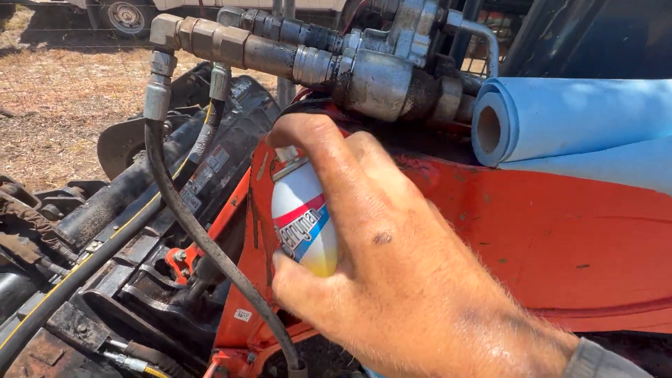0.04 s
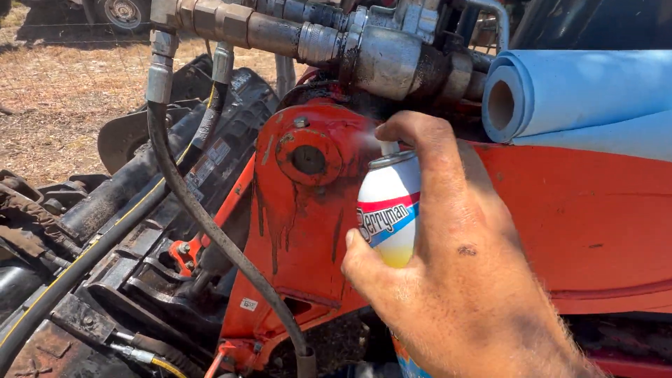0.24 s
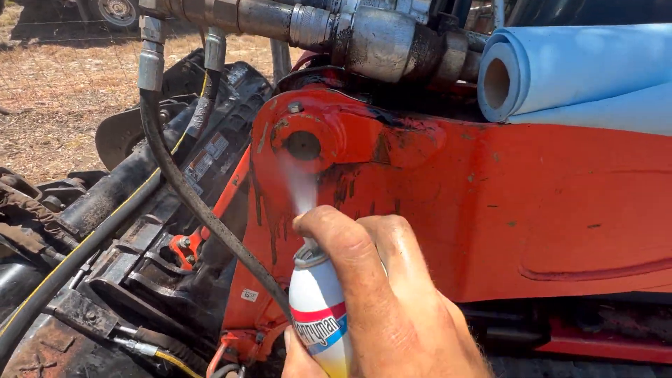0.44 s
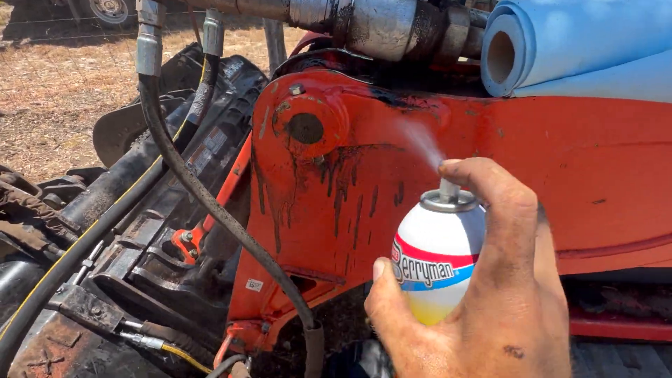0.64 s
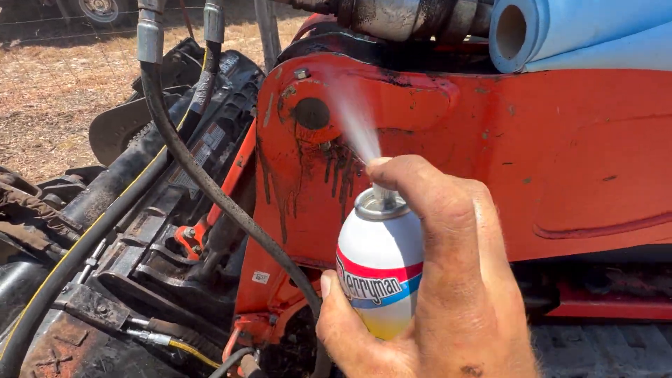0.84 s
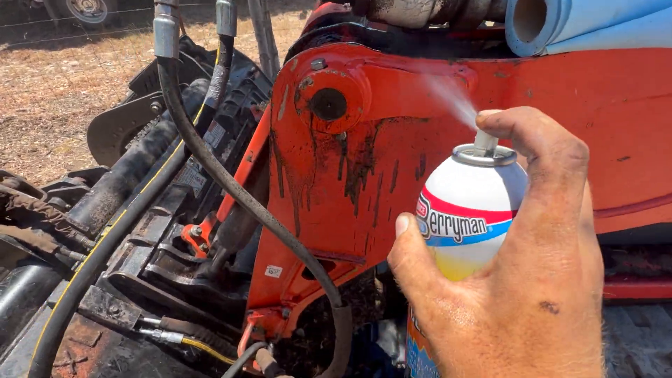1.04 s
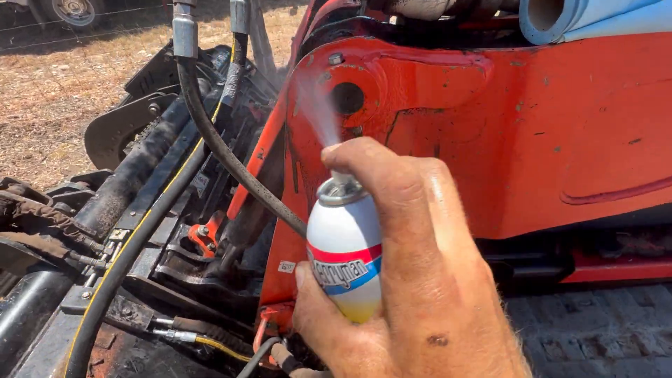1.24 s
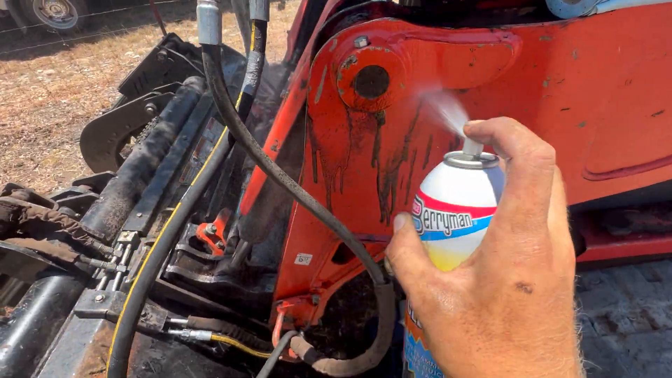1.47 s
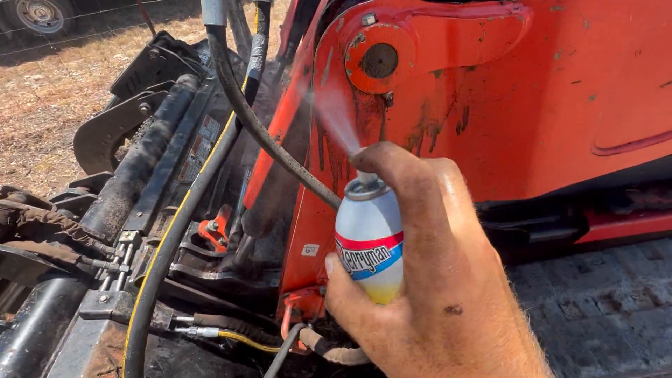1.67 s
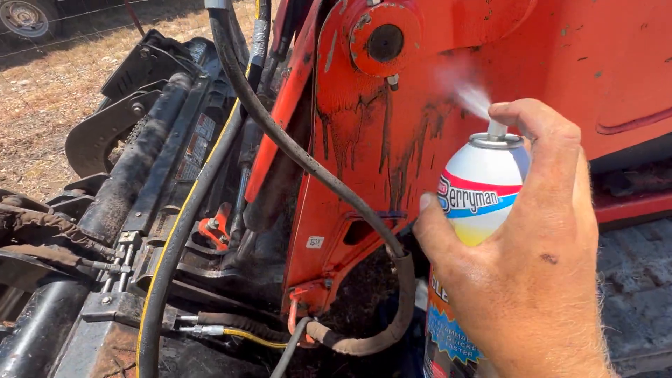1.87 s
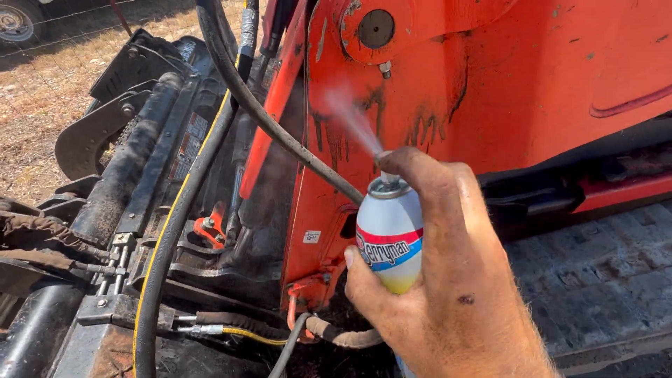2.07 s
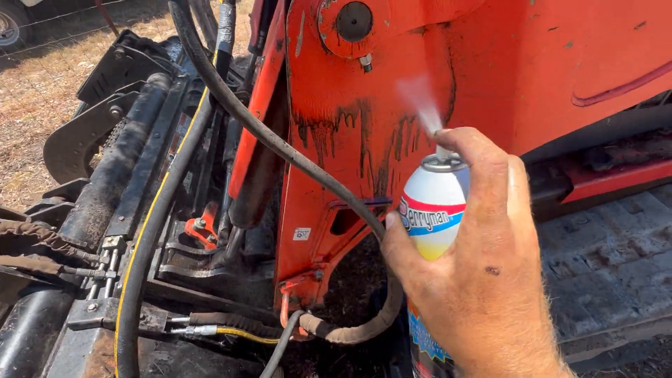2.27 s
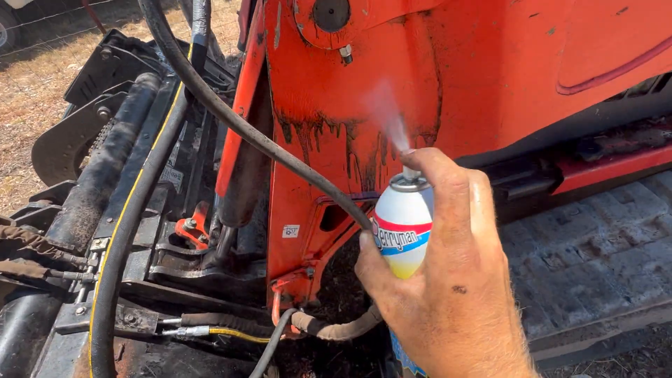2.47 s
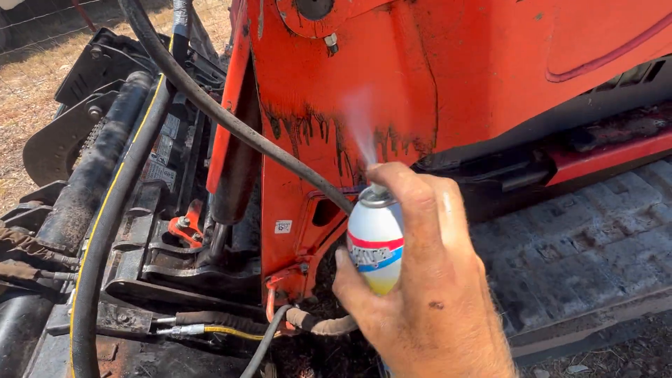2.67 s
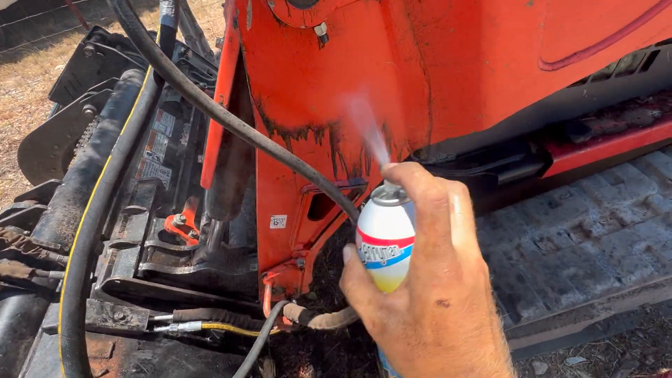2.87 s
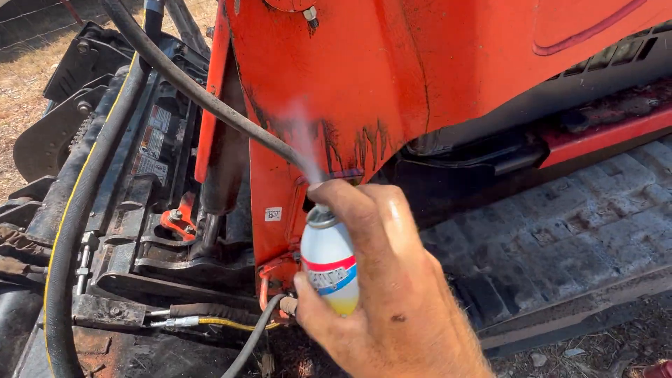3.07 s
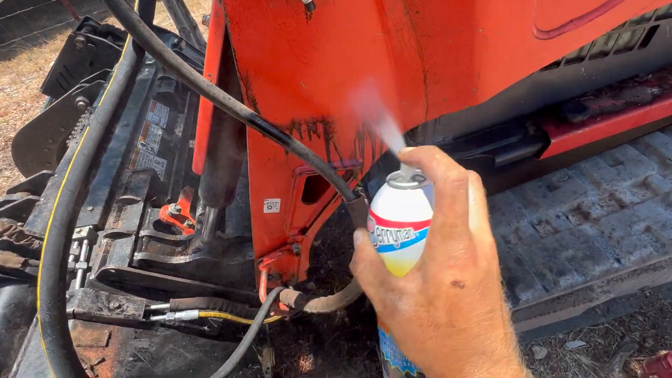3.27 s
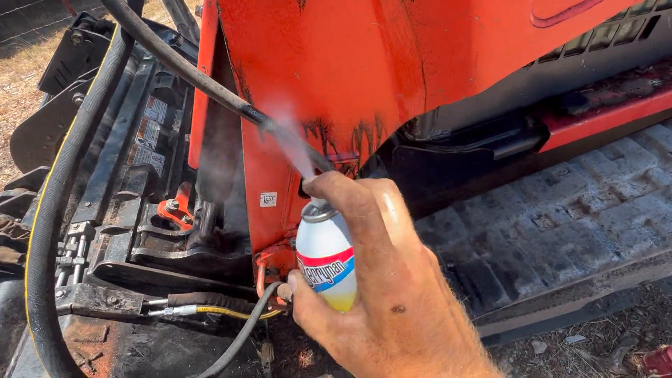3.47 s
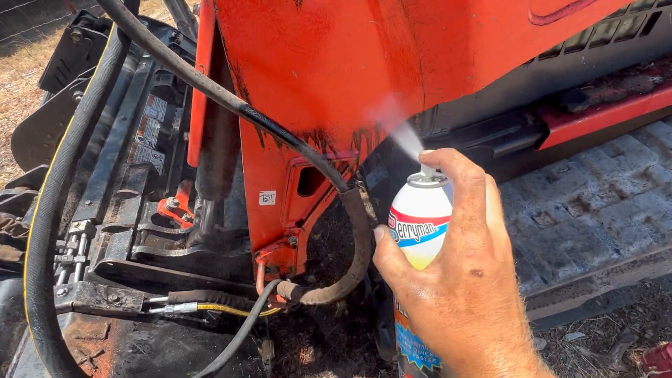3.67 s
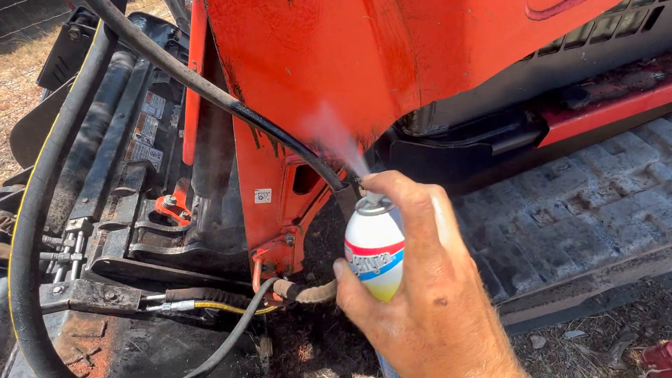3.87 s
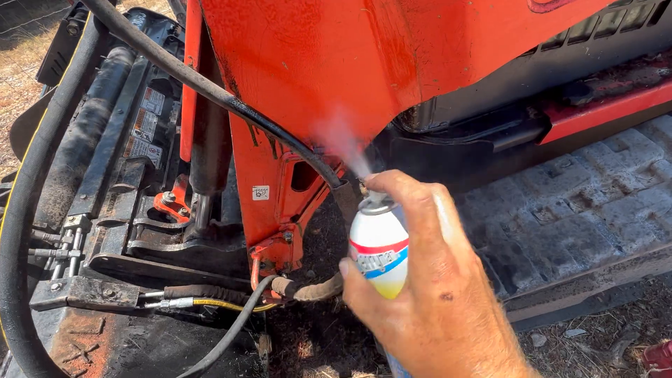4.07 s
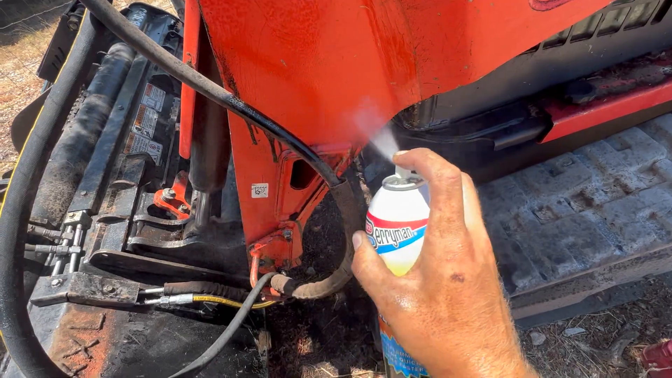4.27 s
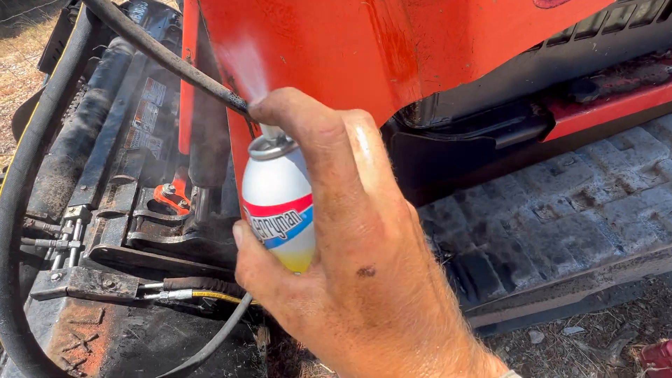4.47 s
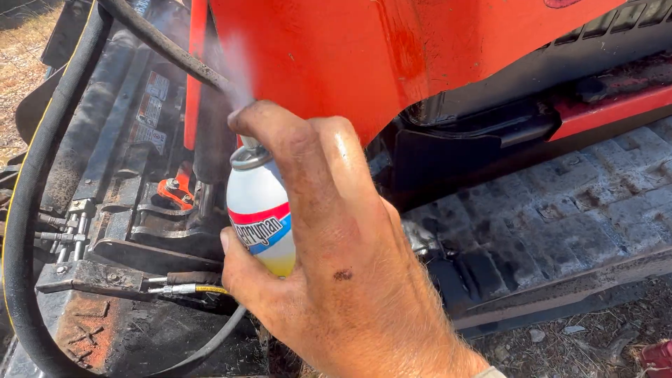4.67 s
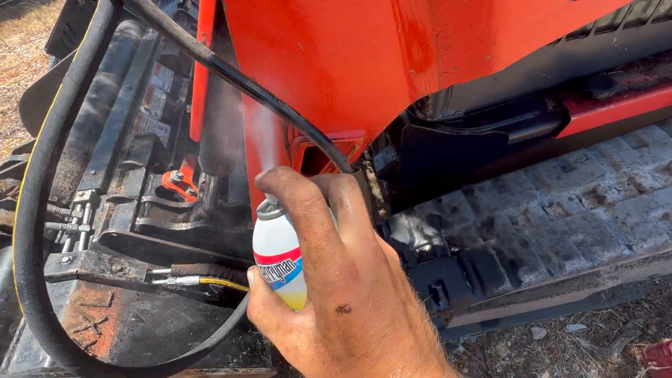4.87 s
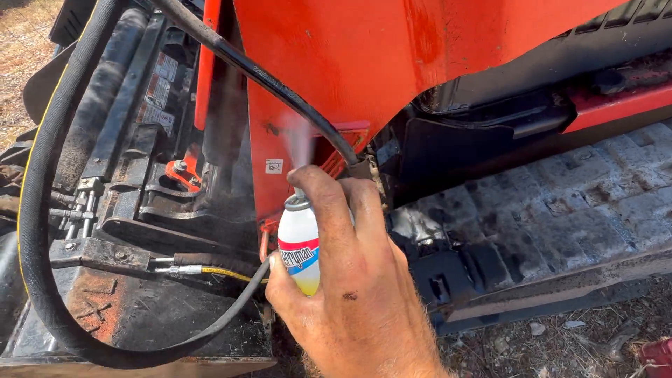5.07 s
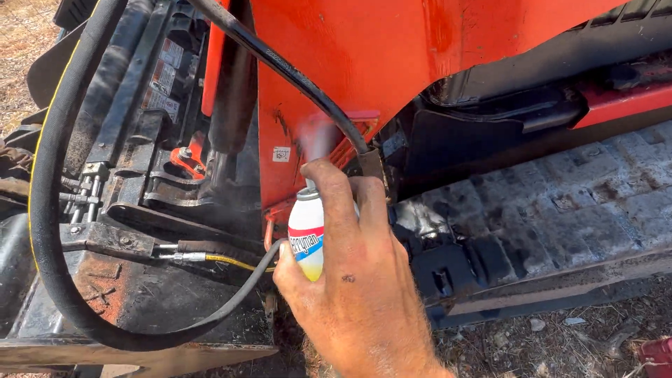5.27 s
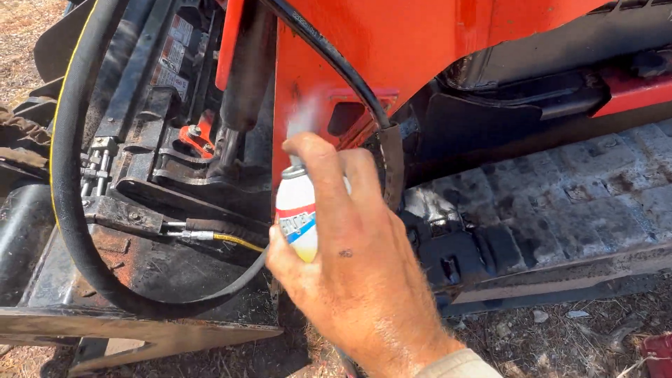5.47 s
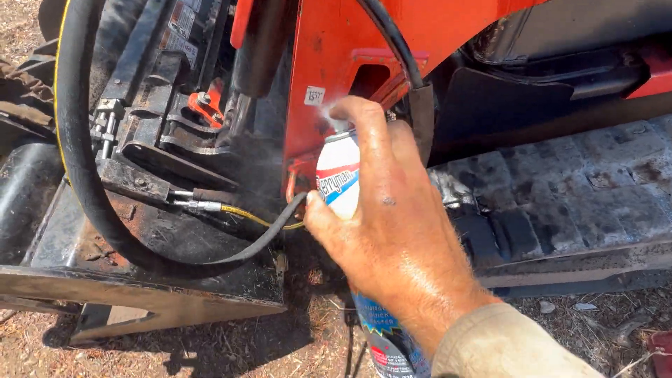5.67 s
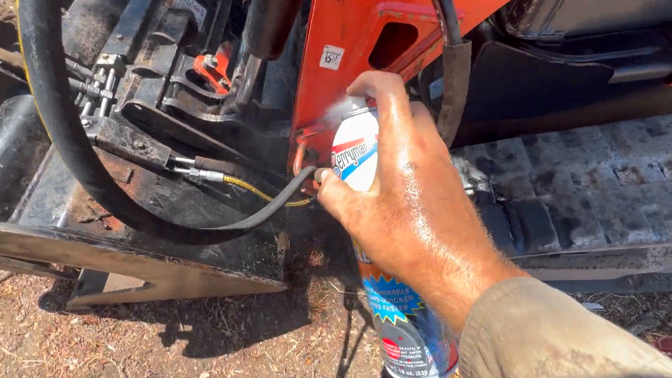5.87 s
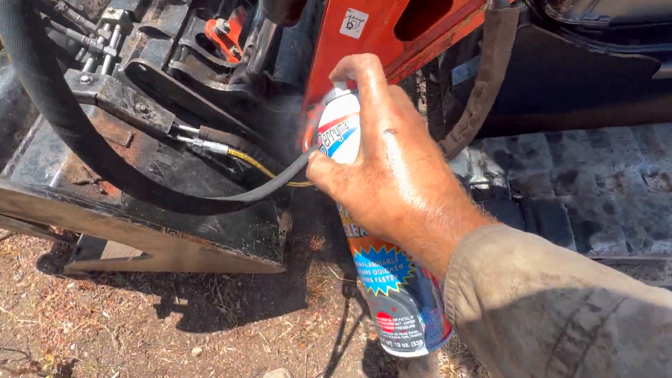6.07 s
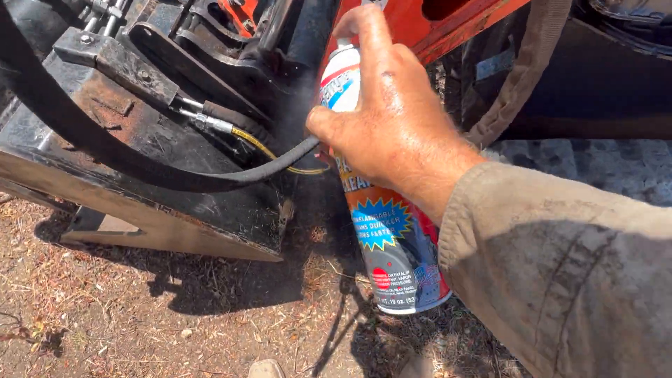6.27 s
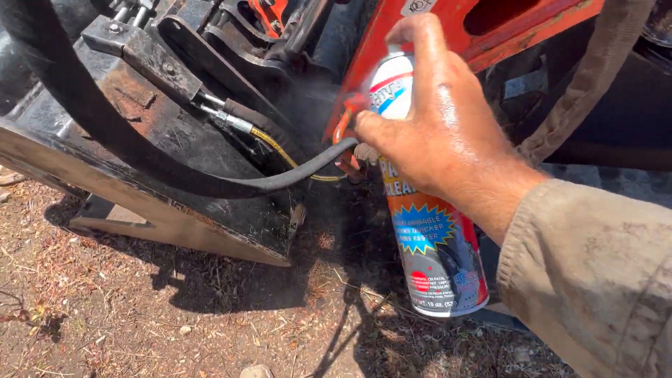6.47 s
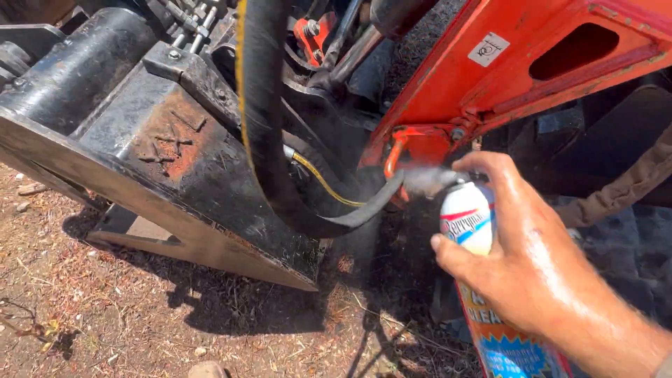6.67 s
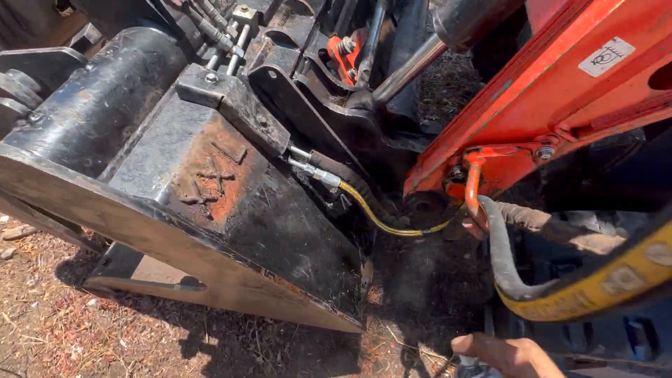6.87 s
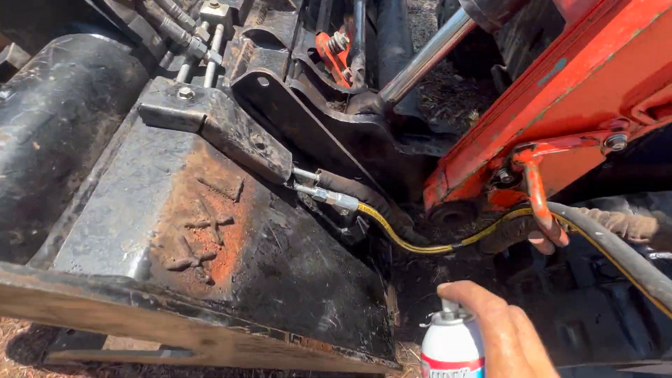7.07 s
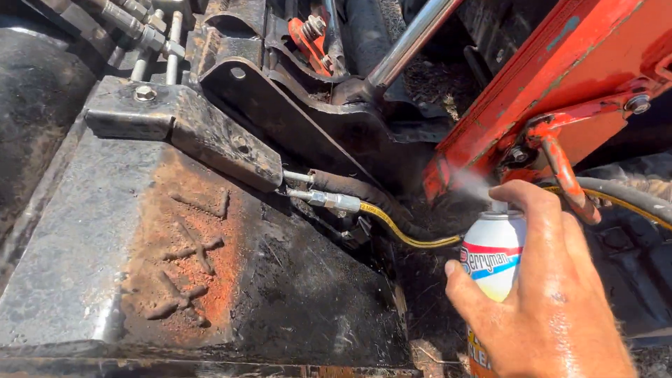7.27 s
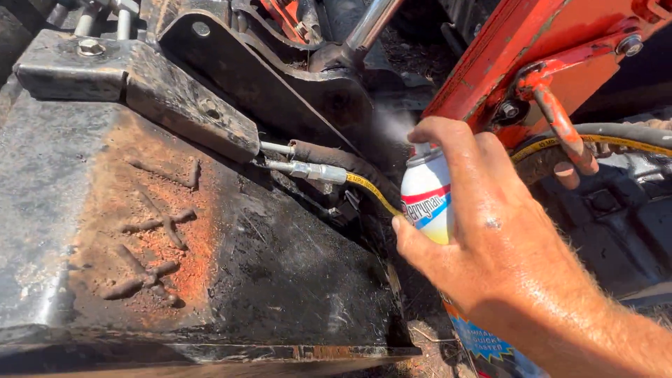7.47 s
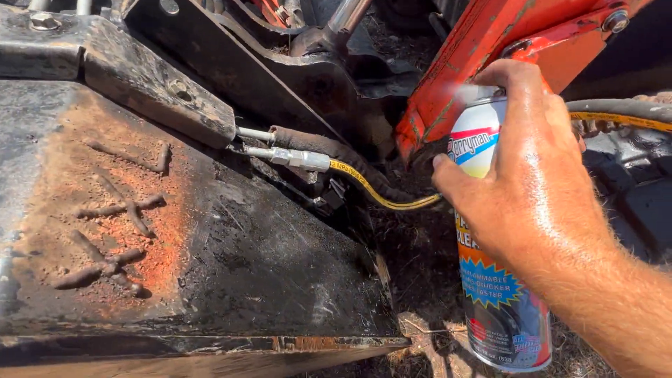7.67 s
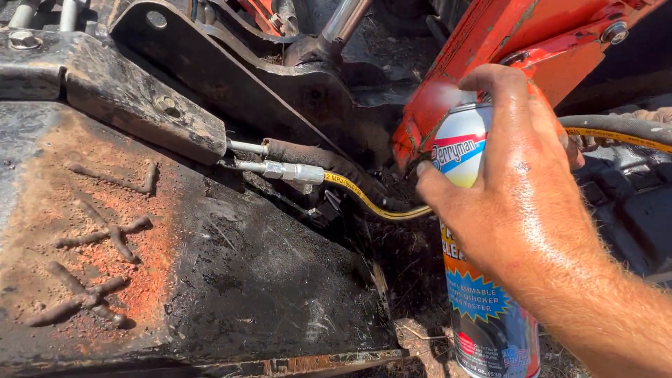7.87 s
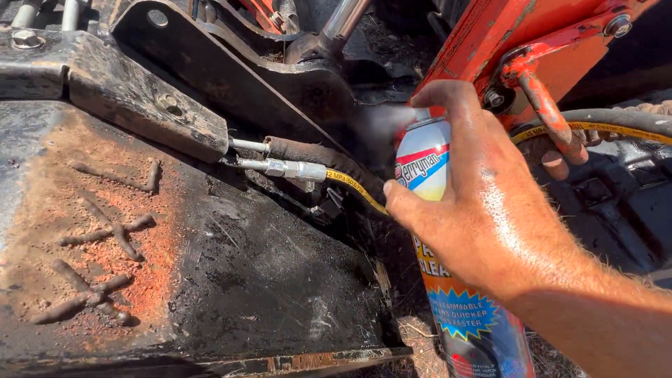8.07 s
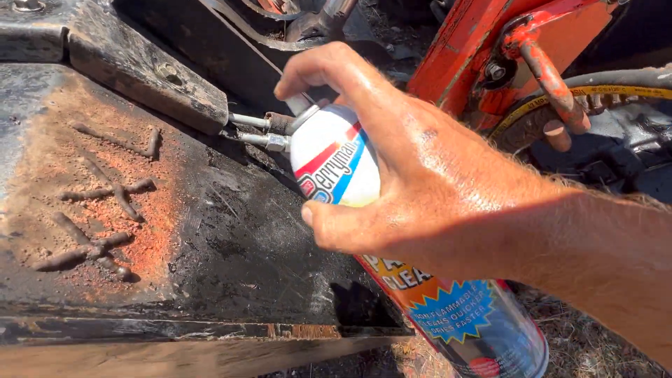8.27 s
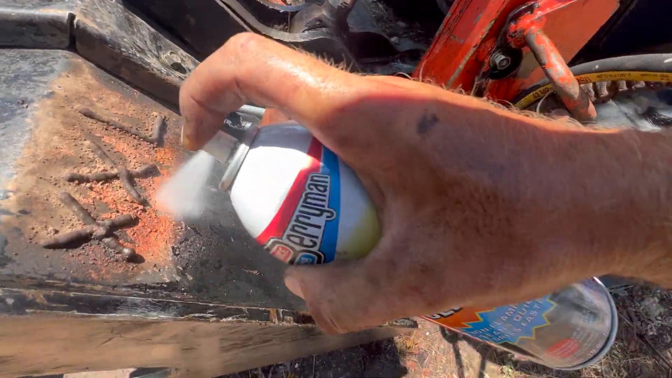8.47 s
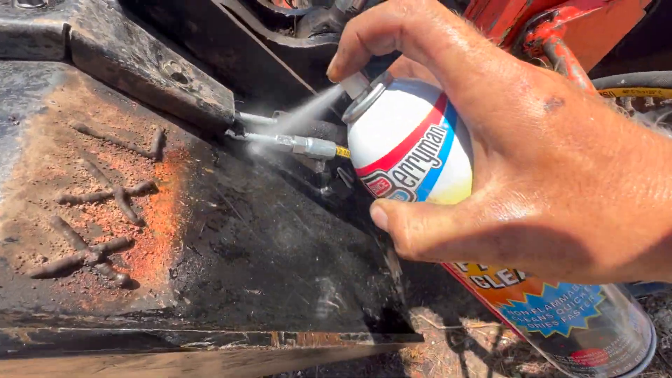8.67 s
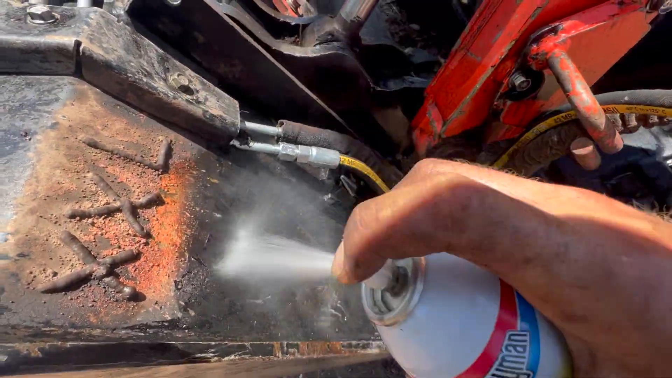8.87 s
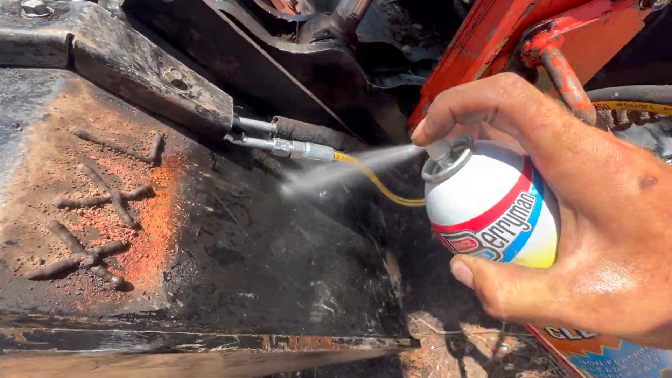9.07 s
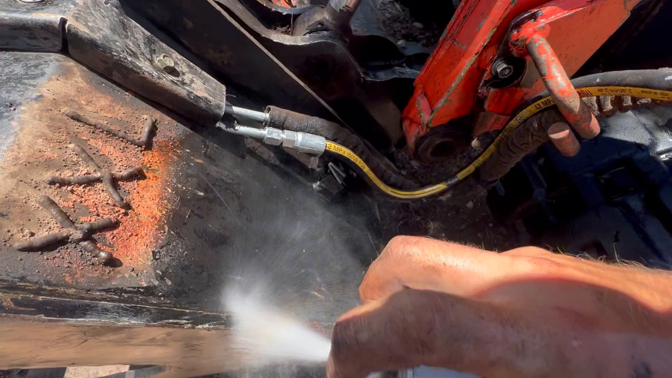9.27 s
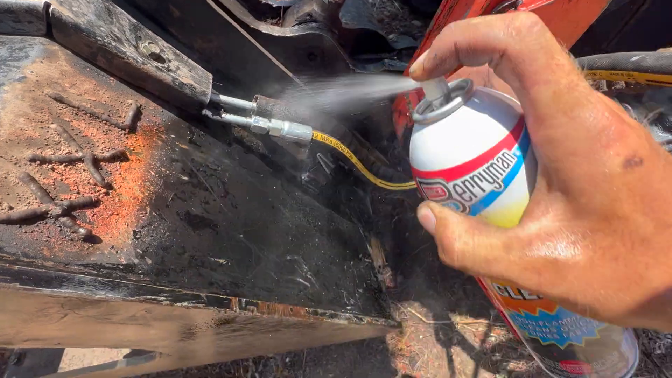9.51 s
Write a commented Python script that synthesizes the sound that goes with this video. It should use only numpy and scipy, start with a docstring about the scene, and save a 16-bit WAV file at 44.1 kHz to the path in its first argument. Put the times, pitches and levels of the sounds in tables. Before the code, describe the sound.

A spray can very close to the microphone hisses loudly onto a steel machine arm outdoors. One blast runs for more than six seconds, its tone swishing as the wrist flicks, then snaps off. A short gap reveals faint fizzing and low site rumble; a medium blast follows, another tiny pause, then a last, nearer blast. Early wind buffets the stereo microphone.

```python
"""Spray can on a steel arm

An aerosol can of cleaner is flicked to and fro over the steel arm of a digger, in long blasts with short breaks.
Bursting slugs of liquid modulate turbulent noise; moving echoes off the steel comb it, and two close ports
receive it with changing phase and balance. The jet also rings a hollow in the arm, and solvent fizzes on the steel.
Behind it are filtered-noise wind and site rumble, and a far engine made as a narrow resonance of noise.
"""
import sys
import numpy as np
from scipy import signal
from scipy.fft import rfft, irfft, next_fast_len
from scipy.io import wavfile

SR = 44100
rng = np.random.default_rng(int(sys.argv[2]) if len(sys.argv) > 2 else 0)


def persist_wave(psi):
    """Save psi, clipped to +-1, as 16-bit WAV."""
    counts = np.round(np.clip(psi, -1, 1) * 32767).astype(np.int16)
    wavfile.write(sys.argv[1], SR, np.atleast_2d(counts).T)


N = 420713
TIME = np.arange(N) / SR   # seconds
HOP = 256   # samples between the short-time spectra of the spray


def from_db(db):
    """Logarithmic level: decibels to amplitude gain."""
    return 10 ** (np.asarray(db) / 20)


def rms_one(x):
    """Normalisation: scale to unit mean power."""
    return x / np.sqrt(np.mean(x ** 2) + 1e-20)


def in_time(rows, times=TIME):
    """Linear interpolation: the columns of a curve at the given times."""
    points_s, *columns = np.transpose(rows)
    return [np.interp(times, points_s, column) for column in columns]


def at_hz(rows, hz):
    """Interpolation on a logarithmic pitch scale: the columns of a spectrum at the given frequencies."""
    points_hz, *columns = np.transpose(rows)
    return [np.interp(np.log(hz + 1), np.log(points_hz), column) for column in columns]


def drift(rate_hz, size=N, step=1):
    """Low-passed random fluctuation of unit rms, one value for every step samples."""
    r = np.exp(-2 * np.pi * rate_hz * step / SR)
    noise = rng.standard_normal(2 * size)
    return rms_one(signal.lfilter([1], [1, -2 * r, r * r], noise)[size:])   # drops the filter's start


def shaped(x, response):
    """Linear filtering: multiply the spectrum by a response that is a function of frequency."""
    size = next_fast_len(N, True)
    hz = np.arange(size // 2 + 1) * SR / size
    return irfft(rfft(x, size) * response(hz), size)[..., :N]


def stereo_noise(spectrum, alike):
    """Partial coherence: coloured noise, partly shared by the two sides and rolled off below 30 Hz."""
    alike = np.clip(alike, 0, 1)
    shared = np.sqrt(alike) * rng.standard_normal(N)
    white = shared + np.sqrt(1 - alike) * rng.standard_normal((2, N))
    return rms_one(shaped(white, lambda hz: from_db(at_hz(spectrum, hz)[0]) * hz ** 4 / (hz ** 4 + 30 ** 4)))


def resonance(hz, width_hz):
    """Resonance: a lightly damped mode selects a narrow band of noise."""
    r = np.exp(-np.pi * width_hz / SR)
    poles = [1, -2 * r * np.cos(2 * np.pi * hz / SR), r * r]
    return rms_one(signal.lfilter([1, 0, -1], poles, rng.standard_normal(N)))


def panned(x, lean_db):
    """Level difference between the ports: lean a sound to the left by so many dB."""
    return x * from_db(np.array([[lean_db], [-lean_db]]) / 2)


def swell(centre, half_width, points=TIME):
    """Gaussian envelope: a smooth rise and fall around one time or frequency."""
    return np.exp(-((points - centre) / half_width) ** 2)


def puffs(rows):
    """Superposition: a gain that swells once for each row of centre, peak level and half length."""
    return sum(from_db(peak_db) * swell(centre_s, half_s) for centre_s, peak_db, half_s in rows)


def sputter(slugs_per_s, slug_s, slug_db, surge_db, surge_hz):
    """Shot noise: slugs arrive at random, burst suddenly and decay, on a flow that surges."""
    arrivals = rng.random(N) < slugs_per_s / SR
    bursts = arrivals * np.minimum(rng.exponential(1, N), 4)
    slugs = signal.lfilter([1], [1, -np.exp(-1 / (slug_s * SR))], bursts + 1e-18)
    return rms_one(np.sqrt(1 + from_db(slug_db) ** 2 * slugs) * from_db(surge_db * drift(surge_hz)))


# dull noise of the yard, before its level setting: time_s, base_level_db
YARD_BASE_LEVEL = [(2.4, -63), (2.9, -53.5), (4.0, -52), (4.7, -49), (5.8, -49), (8.0, -49.5), (8.4, -52),
                   (9.0, -47.5)]
# its spectrum: pitch_hz, relative_density_db
YARD_SPECTRUM = [(21, -36), (35, -13), (70, -3), (116, 0.5), (175, -3), (460, -16), (600, -18.5),
                 (1050, -19.5), (1450, -27), (2290, -52), (2740, -43), (3030, -40), (10000, -57),
                 (15500, -60)]
# deep rumble that grows on the site: time_s, level_db
RUMBLE_LEVEL = [(2.7, -75), (6.0, -60), (7.1, -55.5), (8.3, -50.5), (9.0, -47)]
# its spectrum: pitch_hz, relative_density_db
RUMBLE_SPECTRUM = [(22, -30), (45, -6), (85, 0), (130, -9), (250, -29), (600, -48)]
# brief swelling of the site's middle range: centre_s, peak_db, half_length_s
SURGES = [(8.29, -50.5, 0.17)]
# its spectrum: pitch_hz, relative_density_db
SURGE_SPECTRUM = [(150, -20), (400, -1), (900, 0), (1300, -13), (3000, -30)]


def yard(level_db, engine_db):
    """Superposition of incoherent sources: dull noise, deep rumble and a far engine's unsteady drone."""
    drone = from_db(engine_db) * resonance(hz=114, width_hz=8)   # level relative to the dull noise
    rumble = panned(from_db(in_time(RUMBLE_LEVEL)[0]) * stereo_noise(RUMBLE_SPECTRUM, alike=0.95), lean_db=-3)
    surge = puffs(SURGES) * stereo_noise(SURGE_SPECTRUM, alike=0.72)
    strength = from_db(in_time(YARD_BASE_LEVEL)[0] + level_db)
    dull = strength * (stereo_noise(YARD_SPECTRUM, alike=0.95) + drone)
    return rumble + surge + panned(dull, lean_db=-1)


# breeze on the ports, before its level setting and lumps: time_s, base_level_db
BREEZE = [(0.0, -56), (0.5, -52), (0.95, -44.5), (1.3, -51.5), (2.0, -49.5), (2.3, -66), (2.7, -75),
          (9.0, -66)]
# gusts, each peaking one half length after its start, before their level setting: start_s, base_peak_db
GUSTS = [(0.664, -39), (0.917, -31), (1.125, -39), (1.302, -35), (1.454, -39), (1.582, -36), (1.741, -33),
         (1.91, -41), (1.98, -38)]
# spectrum of the buffeting: pitch_hz, relative_density_db
WIND_SPECTRUM = [(22, -36), (45, -1), (80, -2.5), (130, -6.5), (220, -13.5), (500, -26), (1500, -70)]


def wind(level_db, gust_db, gust_s, lumps_db):
    """Turbulent pressure: low buffeting, mostly on the right, pushes one port while it pulls the other."""
    gusts = sum(from_db(peak_db + gust_db) * swell(start_s + gust_s, gust_s) for start_s, peak_db in GUSTS)
    breeze = from_db(in_time(BREEZE)[0] + level_db + lumps_db * drift(6.6))
    buffeting = stereo_noise(WIND_SPECTRUM, alike=.7) * [[-1], [1]]
    return panned((breeze + gusts) * buffeting, lean_db=-8.5)


# solvent fizzing on the wet steel: time_s, level_db
FIZZ_LEVEL = [(0, -61), (6.95, -54.5), (7.06, -50.5), (7.14, -46), (8.3, -57)]
# its spectrum: pitch_hz, relative_density_db
FIZZ_SPECTRUM = [(1500, 2.5), (3500, -9), (4800, -4), (6300, -1), (8000, -8), (11000, -15.5), (15000, -14)]
# short faint puffs of noise between the blasts: centre_s, peak_db, half_length_s
FAINT_PUFFS = [(0.095, -52, 0.0015), (6.76, -56, 0.012), (8.269, -47, 0.002)]


def fizzing():
    """Bubble noise: many random small bursts modulate the noise of fizzing solvent and of short faint puffs."""
    bubbling = sputter(slugs_per_s=160, slug_s=0.0026, slug_db=1, surge_db=2.5, surge_hz=7.9)
    strength = from_db(in_time(FIZZ_LEVEL)[0]) + puffs(FAINT_PUFFS)
    return strength * bubbling * panned(stereo_noise(FIZZ_SPECTRUM, alike=0.085), lean_db=-0.5)


# the jet crosses the opening in the hollow arm: centre_s, peak_db, half_length_s
CROSSINGS = [(5.36, -42, 0.17), (5.71, -38.5, 0.065)]


def blown_hollow():
    """Cavity resonance: the jet's turbulence rings the hollow as it crosses the opening."""
    return panned(puffs(CROSSINGS) * resonance(hz=222.6, width_hz=5.7), lean_db=-1.5)


# flicks of the wrist, out to the side and back: turning_point_s, reach (0-1), added_slant
SWEEPS = [(0.14, 0.06, 0.32), (0.46, 0.25, 1), (0.85, 0.84, 0.25), (1.31, 0.7, 0.98), (1.7, 0.54, 0.74),
          (2.06, 0.63, 0.72), (2.39, 0.2, 0.54), (2.77, 0.8, .6), (3.13, 0.75, 1.1), (3.49, 0.45, 0.83),
          (3.84, 0.34, 0.29), (4.17, 0.16, 0.27), (4.88, 0.4, 0), (5.54, 0.2, 0.3), (5.77, 0, 0.081),
          (6.02, 0.14, 0.32), (6.33, 0, 0), (6.65, 0.37, 0), (7.43, 0.3, 0.37), (7.97, 0.5, 0.47),
          (8.57, 0.5, 0.049), (8.88, 0.66, 0.29), (9.34, 0.56, 0.26)]
SWEEP_S = 0.077   # half length of a flick
# a full reach beams the hiss to the right and lengthens its echoes
SWEEP_LEAN_DB, SWEEP_DETOUR_MS = 3, 0.059


def sweep(times):
    """Directivity: how far the wrist has turned the jet from its mean direction."""
    turn = sum(reach * swell(turning_s, SWEEP_S, times) for turning_s, reach, _ in SWEEPS)
    return turn - turn.mean()


# spells with the valve open: open_s, shut_s
PRESSES = [(-.05, 0.019), (0.102, 6.687), (7.16, 8.221), (8.364, 9.8)]


def valve(open_db_per_s, shut_db_per_s, tail_db, tail_t60):
    """Exponential growth and decay: the valve snaps open and shut; a brief tail hangs between the steel parts."""
    flow = np.zeros(N)
    for opens, shuts in PRESSES:
        before, after = np.maximum(opens - TIME, 0), np.maximum(TIME - shuts, 0)
        closing = np.maximum(-shut_db_per_s * after, tail_db - 60 * after / tail_t60)
        flow = np.maximum(flow, from_db(np.maximum(closing - open_db_per_s * before, -120)))
    return flow


# basic spectrum of the jet: pitch_hz, relative_density_db
JET_SPECTRUM = [(40, -46), (150, -26.5), (300, -18), (480, -22), (800, -12.2), (1200, -12.5), (1550, -10),
                (2000, -9.5), (2800, -6), (3500, -10), (4200, -7.5), (5000, -3.5), (6100, -2),
                (6900, -1.15), (8200, 0), (9800, -9), (11300, -6), (12400, -6), (14200, -4), (15600, -2)]
# nearness of the can to the steel and the listener: time_s, gain_db (before each part's share)
NEARNESS = [(0.135, 0), (0.165, 1.5), (0.98, 3.5), (1.9, 1), (3.3, 0.96), (4.55, 1.5), (5.2, -1.5),
            (6.3, -2.5), (6.68, -1), (7.25, -0.7), (7.65, -1.5), (8.2, 1.1), (8.4, 3), (8.87, 6),
            (9.05, 4.5), (9.54, 4)]
# parts of the spray, in order rush of air, splash on the steel, hiss of the nozzle, sizzle, fine mist:
# from_hz, to_hz, share of the nearness gain (ratio), change_db at full reach
PARTS = [(500, 1650, 1.12, -1), (2730, 5560, 0.36, -0.2), (5570, 7200, 1.13, 4.5), (8800, 10840, 0.62, -10),
         (11300, 16000, 0.67, 4)]
# treble above the sizzle: time_s, gain_db
TREBLE = [(0.13, -4.5), (1.9, -5.5), (2.6, -1.5), (4.4, -2), (5.35, 0.5), (5.7, -2.5), (6.4, -3.5),
          (7.65, -0.5), (8.8, -1.6), (9.54, 0)]
# the treble gain fades in between these two: pitch_hz
TREBLE_HZ = (9700, 10800)
# gain of the splash band, rising slightly towards the end: time_s, gain_db
SPLASH = [(6.5, 2), (7.2, 2.5), (9.54, 3)]
# the splash gain fades in over the first pair and out over the second: pitch_hz
SPLASH_HZ = (2700, 3500, 4700, 5600)


def jet_colour(hz, times, waver_db, waver_hz):
    """Time-varying spectrum: each part follows nearness and the flicks, and wavers a little by itself."""
    near_db, turn = in_time(NEARNESS, times)[0], sweep(times)
    levels = []
    for _, _, share, turn_db in PARTS:
        waver = waver_db * drift(waver_hz, size=len(times), step=HOP)
        levels.append(share * near_db + turn_db * turn + waver)
    edges_hz = np.sort(np.array(PARTS)[:, :2].ravel())
    # each part is full within its edges and blends into its neighbours between them
    shares = np.array([np.interp(hz, edges_hz, np.repeat(part, 2)) for part in np.eye(len(PARTS))])
    parts_db = shares.T @ np.array(levels)
    treble_db = np.outer(np.interp(hz, TREBLE_HZ, [0, 1]), in_time(TREBLE, times)[0])
    splash_db = np.outer(np.interp(hz, SPLASH_HZ, [0, 1, 1, 0]), in_time(SPLASH, times)[0])
    return from_db(at_hz(JET_SPECTRUM, hz)[0][:, None] + parts_db + treble_db + splash_db)


def echo(hz, delay_ms):
    """Propagation delay: a phase lag proportional to frequency, on a path that changes with time."""
    angle = (2 * np.pi * hz[:, None] * delay_ms / 1000).astype(np.float32)
    return np.cos(angle) - 1j * np.sin(angle)


def clutter(hz, times, farthest_ms, swing_ms, swing_hz, count=4):
    """Scattering: echoes off hand, hoses and rams swing in path length, so the hiss swirls."""
    delays_ms = np.linspace(.9, farthest_ms, count) * rng.uniform(.85, 1.15, count)
    flick_ms = SWEEP_DETOUR_MS * sweep(times)
    paths = 0
    for delay_ms in delays_ms:
        wander_ms = swing_ms * drift(swing_hz, size=len(times), step=HOP)
        paths = paths + echo(hz, delay_ms + flick_ms + wander_ms)
    return paths * (np.minimum(hz / 3200, 1) / np.sqrt(count))[:, None]   # small parts reflect mainly short waves


# a lower and an upper pitch where the two sides are set in antiphase: slant (0-2), lower_hz, upper_hz
OPPOSED = [(0, 1430, 4850), (.2, 1600, 4900), (.55, 1900, 5200), (1.1, 1950, 4200), (1.3, 2650, 4300),
           (2.1, 2750, 4450)]
# half widths of the antiphase bands: lower_hz, upper_hz
OPPOSED_WIDTH_HZ = (115, 200)


def opposition(hz, slant):
    """Antiphase: how fully the two sides are opposed, 0-1, around a lower and an upper pitch."""
    slants, *pitches = np.transpose(OPPOSED)
    bands = []
    for centres_hz, width_hz in zip(pitches, OPPOSED_WIDTH_HZ):
        centre_hz = np.interp(slant, slants, centres_hz)
        bands.append(np.exp(-((hz[:, None] - centre_hz) / width_hz) ** 4))
    return bands


# the two ports in the bass and the top treble, for every slant:
# pitch_hz, left_lead_rad, likeness (0-1, before blending), left_minus_right_db
PORTS = [(150, -0.2, 0.95, -3), (8450, -0.95, 0.88, -1.5), (9400, 1.6, 0.85, -0.3), (10000, 2.7, 0.97, 0),
         (10500, 3.14, 0.997, 0), (10850, 3.5, 0.98, 0), (11200, 4.5, 0.9, 0), (12100, 6.28, 0.9, 0),
         (13300, 8.3, 0.92, 0), (13900, 9.42, 0.997, 0), (14400, 10.3, 0.94, 0), (15500, 12.6, 0.9, 0)]
# between them, jet square on the steel: pitch_hz, left_lead_rad, likeness (0-1), left_minus_right_db
SQUARE = [(700, -1.8, .92, -9), (1100, -2.5, .92, -3), (1250, -2.8, .93, -1), (1420, -3.14, .985, 0),
          (1750, -3.7, .88, 0), (2050, -4.3, .75, -2), (2500, -5.8, .65, -5), (2900, -7.3, .55, -4),
          (3300, -5.3, .35, -6), (3700, -6.4, .6, -7), (4200, -6.7, .75, -3), (4700, -9.4, .3, -5),
          (5200, -9.5, .75, -6), (5700, -11.3, .55, -6), (6200, -12.4, .72, -8), (6700, -12.1, .45, -5),
          (7200, -12.9, .72, -7.5), (7900, -11.6, .82, -3.5)]
# jet slanting across the steel: pitch_hz, left_lead_rad, likeness (0-1), left_minus_right_db
SLANTED = [(700, -1.5, .92, -6), (1100, -2.0, .86, -3.5), (1500, -3.3, .62, 1.5), (1850, -3.0, .997, 0),
           (2050, -3.0, .99, .3), (2500, -3.1, .8, -3), (2900, -3.6, .7, -6), (3300, -6.3, .62, -4),
           (3700, -5.6, .3, -9), (4300, -3.1, .72, -2), (4700, -3.4, .5, -1), (5200, -2.9, .78, -2),
           (5700, -3.4, .62, -3), (6200, -5.8, .78, -4), (6700, -5.8, .4, -8), (7200, -5.8, .8, -11),
           (7900, -5.5, .82, -5)]
# jet grazing along the steel: pitch_hz, left_lead_rad, likeness (0-1), left_minus_right_db
GRAZING = [(700, -1.15, .9, -4), (1100, -1.4, .82, -4), (1450, -2.7, .72, -2), (1800, -2.3, .78, 0),
           (2100, -2.3, .72, 2), (2300, -2.75, .85, 1.5), (2550, -3.1, .992, 0), (2900, -3.15, .995, 0),
           (3300, -4.7, .62, -6), (3700, -6.8, .35, -5), (4200, -9.1, .5, -5), (4700, -6.3, .48, -5),
           (5200, -6.8, .2, -9), (5700, -5.7, .52, -9), (6200, -6.2, .58, -5), (6700, -7.5, .52, -8),
           (7200, -6.3, .45, -8), (7900, -5.1, .88, -5)]
# how the jet meets the steel between flicks: time_s, slant (0 square on, 1 slanting, 2 grazing)
SLANT = [(0.0, 0.73), (0.7, 0.041), (1.9, 0.016), (2.6, 0.39), (2.95, 0.48), (3.3, 0.49), (4.0, 0.52),
         (4.33, 0.48), (4.47, 1.8), (4.9, 1.8), (5.3, 1.9), (5.5, 1.22), (6.22, 1.29), (6.36, 1.7),
         (6.45, 1.8), (6.54, 0.6), (7.2, 0.02), (7.85, .1), (8.2, 0.69), (8.37, 1.6), (8.52, 1.43),
         (8.62, 1.03), (8.78, 0.17), (9.54, 0.31)]


def port_pair(hz, times):
    """Mutual coherence: phase, likeness and balance of the ports shift with the slant of the jet."""
    slant = in_time(SLANT, times)[0]
    slant = slant + sum(tilt * swell(turning_s, SWEEP_S, times) for turning_s, _, tilt in SWEEPS)
    tables, cross, balance_db = (SQUARE, SLANTED, GRAZING), 0, 0
    for table, corner in zip(tables, np.eye(len(tables))):
        rows = np.array(sorted(PORTS + table))
        rows[:, 1] = np.unwrap(rows[:, 1])
        phase, alike, lean_db = at_hz(rows, hz)
        share = np.interp(slant, np.arange(len(tables)), corner)
        cross = cross + np.outer(alike * np.exp(1j * phase), share)
        balance_db = balance_db + np.outer(lean_db, share)
    lower, upper = opposition(hz, slant)
    cross = cross * (1 - lower - upper) - lower - upper   # -1 is full antiphase
    balance_db = balance_db * (1 - lower)
    return [c.astype(np.float32) for c in (np.angle(cross), np.abs(cross) ** .75, balance_db)]


# detour of the hiss by way of the steel, before the flicks: time_s, left_delay_ms, right_delay_ms
MIRROR = [(0.0, 1.04, 1.23), (0.7, 0.88, 1.15), (1.1, 0.71, 1.23), (1.85, .75, 1.13), (2.2, 0.84, 1.11),
          (2.9, 0.99, 1.2), (4.25, 0.85, 1.26), (4.6, 1, 1.44), (5.3, 1.0, 1.17), (5.8, 0.52, .6),
          (6.35, 0.94, 1), (7.25, 1.14, 1.06), (7.7, 1.3, 0.94), (8.1, 1.05, 0.51), (8.5, 0.51, 0.62),
          (9.1, 0.61, 0.7), (9.54, 0.75, 0.68)]
# strength of that echo, greatest when the flat of the arm faces the can: time_s, echo_db
FACING = [(0, -17), (4.2, -23), (4.6, -21), (5.2, -14.5), (5.6, -15), (9.5, -16)]
# aim of the can between flicks: time_s, left_minus_right_db
AIM = [(0.13, -1), (1.1, 0.5), (1.55, 1.5), (2.9, 1.5), (4.1, 0), (5.0, -1), (6.67, 0.5), (7.2, 1),
       (8.5, -2), (9.54, -1.8)]
CLUTTER_DB = -5.5


def at_ports(hz, times, shared, scattered):
    """Interference: direct sound and echoes combine at two ports whose phase and balance depend on pitch."""
    phase, alike, balance_db = port_pair(hz, times)
    unlike = np.sqrt(1 - alike ** 2)
    mirrored, flick_ms = from_db(in_time(FACING, times)[0]), SWEEP_DETOUR_MS * sweep(times)
    reach = np.interp(hz, [2000, 3500], [0, 1])[:, None]   # the steel mirrors only the higher pitches
    to_left, to_right = (1 + mirrored * reach * echo(hz, ms + flick_ms) for ms in in_time(MIRROR, times))
    common, own = (from_db(CLUTTER_DB) * clutter(hz, times, farthest_ms=3.2, swing_ms=0.07, swing_hz=1.27)
                   for _ in range(2))
    left_paths = to_left + alike * common + unlike * own
    left = (alike * shared + unlike * scattered) * left_paths * np.exp(1j * phase)
    right = shared * (to_right + common)
    lean_db = in_time(AIM, times)[0] - SWEEP_LEAN_DB * sweep(times)
    beamed = np.interp(hz, [4000, 5600, 8000, 9500], [0, 1, 1, 0])[:, None]   # band that follows the aim
    ratio = from_db(balance_db + beamed * lean_db)
    return np.array([left * ratio, right]) / np.sqrt(1 + ratio ** 2)


# band that the can and hand shade from the left port: time_s, centre_hz, depth_db, half_width_hz
LEFT_SHADE = [(0.1, 4200, -11, 450), (1.1, 4140, -3, 453), (1.55, 3600, -9, 600), (2.2, 4470, -8, 600),
              (2.7, 4850, -7, 600), (3.4, 4550, -8, 590), (4.2, 4730, -6, 700), (4.7, 4650, -7, 1000),
              (5.1, 4900, -11, 600), (5.8, 5100, -11, 704), (6.5, 5300, -10, 650), (7.2, 4700, -11, 450),
              (8.5, 5500, -3.5, 486), (9.54, 4800, -1, 500)]
# the same for the right port: time_s, centre_hz, depth_db, half_width_hz
RIGHT_SHADE = [(0.1, 4700, -9.5, 500), (1.0, 4400, -1.5, 500), (2.2, 4160, -4, 700), (3.0, 4730, -4.5, 900),
               (4.2, 4700, -4.5, 810), (5.2, 4770, -5.5, 450), (6.5, 4880, -1, 450),
               (9.54, 4100, -3.5, 450)]


def shade(hz, times):
    """Acoustic shadow: each port loses a band of the hiss, which wanders as the can moves."""
    tracks = [in_time(table, times) for table in (LEFT_SHADE, RIGHT_SHADE)]
    return from_db([depth_db * swell(centre_hz, width_hz, hz[:, None])
                    for centre_hz, depth_db, width_hz in tracks])


def spray(level_db):
    """Jet noise: sputtering turbulence is coloured by the jet and its paths, and let out by the valve."""
    grain = sputter(slugs_per_s=420, slug_s=0.0007, slug_db=-2.0, surge_db=0.45, surge_hz=22)
    turbulence = rng.standard_normal((2, N)) * grain
    hz, times, noises = signal.stft(turbulence, SR, nperseg=4 * HOP, noverlap=3 * HOP)
    received = at_ports(hz, times, *noises) * shade(hz, times)
    pair = received * jet_colour(hz, times, waver_db=0.75, waver_hz=4.0)
    hiss = signal.istft(pair, SR, nperseg=4 * HOP, noverlap=3 * HOP)[1][:, :N]
    flow = valve(open_db_per_s=2600, shut_db_per_s=1408, tail_db=-33, tail_t60=0.07)
    return from_db(level_db) * hiss * flow


def scene():
    """Superposition: the open air, the fizzing steel, the blown hollow and the spray."""
    air = yard(level_db=2.5, engine_db=-7.5) + wind(level_db=4.0, gust_db=-2.5, gust_s=0.018, lumps_db=3.0)
    return air + fizzing() + blown_hollow() + spray(level_db=-12.5)


def record(dry):
    """Low-pass filtering: the top is cut steeply at 15750 Hz."""
    return shaped(dry, lambda hz: 1 / np.sqrt(1 + (hz / 15750) ** 500))


dry = scene()
out = record(dry)
persist_wave(out)
```